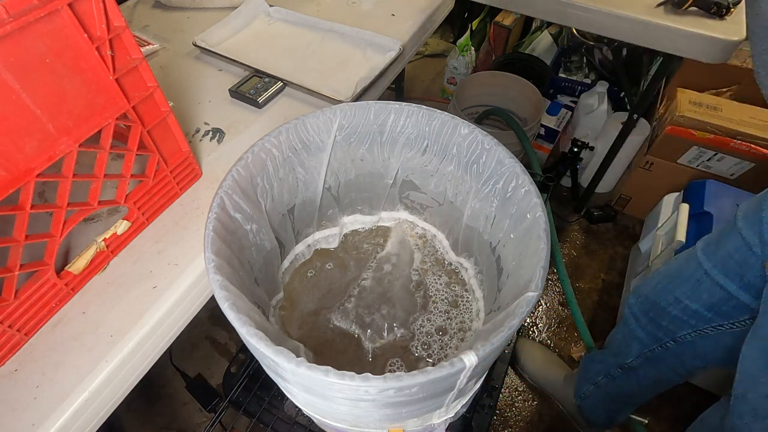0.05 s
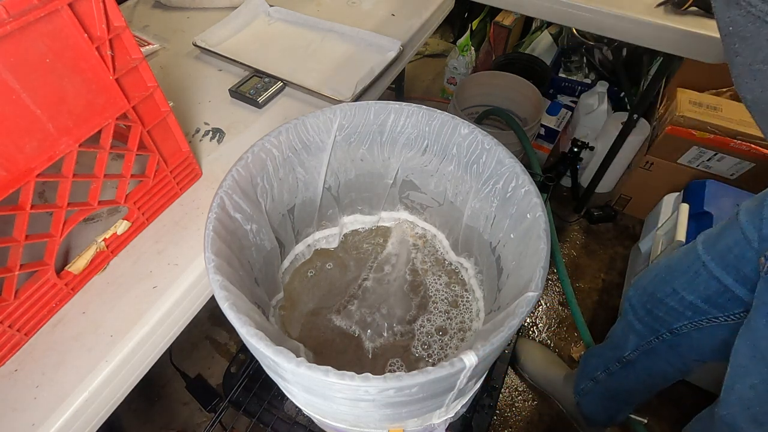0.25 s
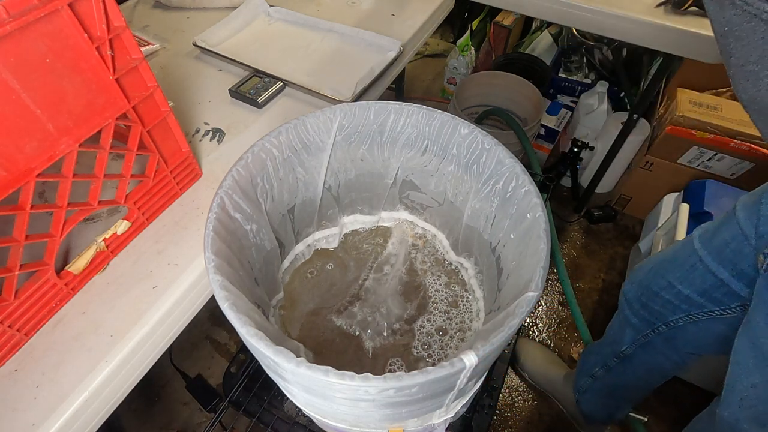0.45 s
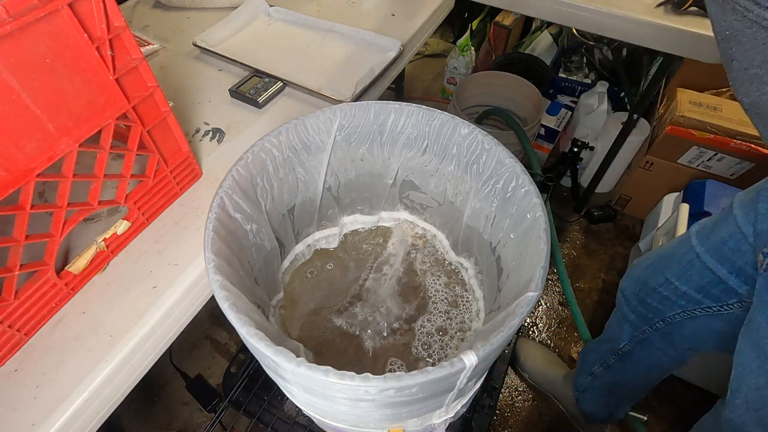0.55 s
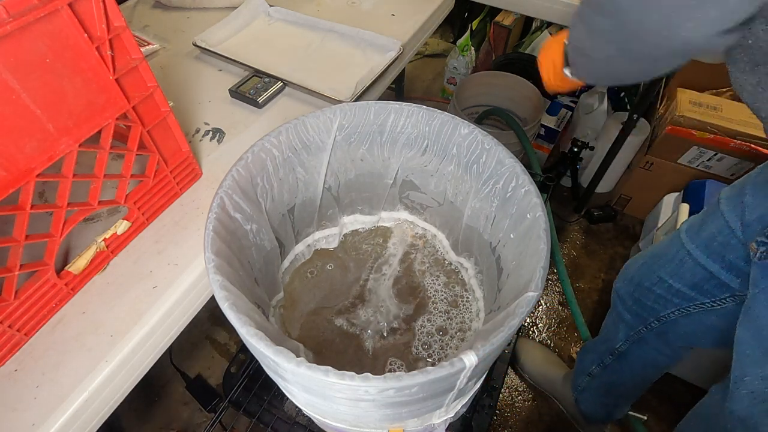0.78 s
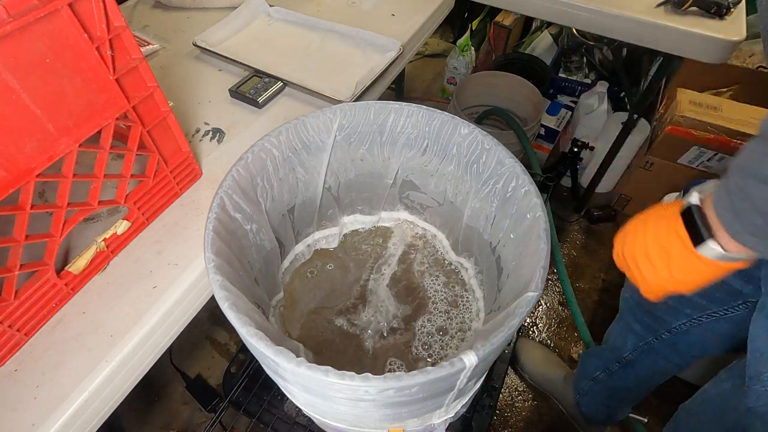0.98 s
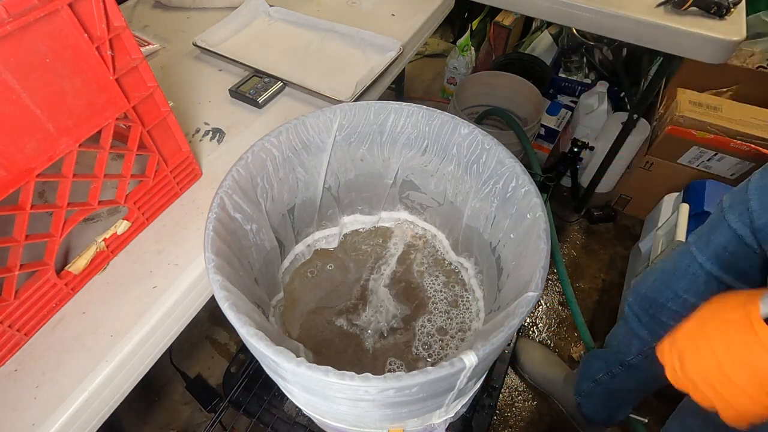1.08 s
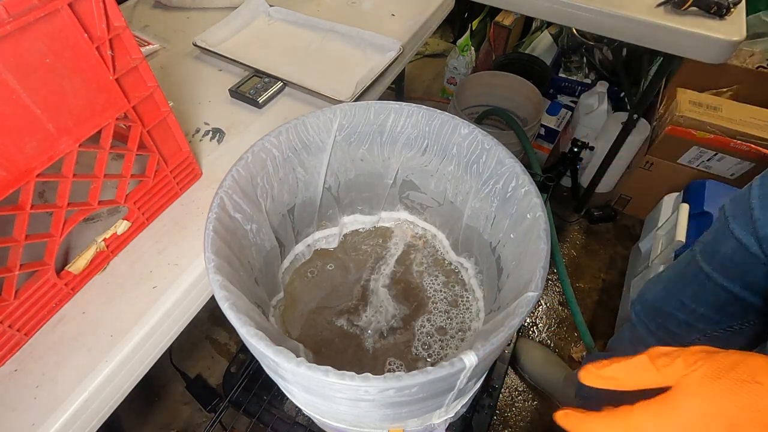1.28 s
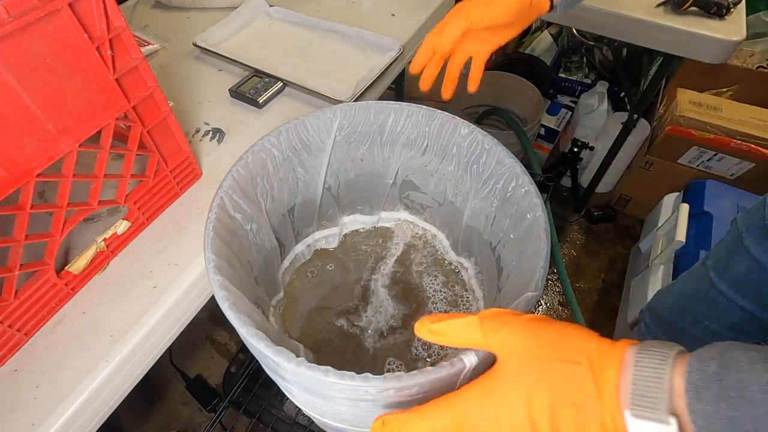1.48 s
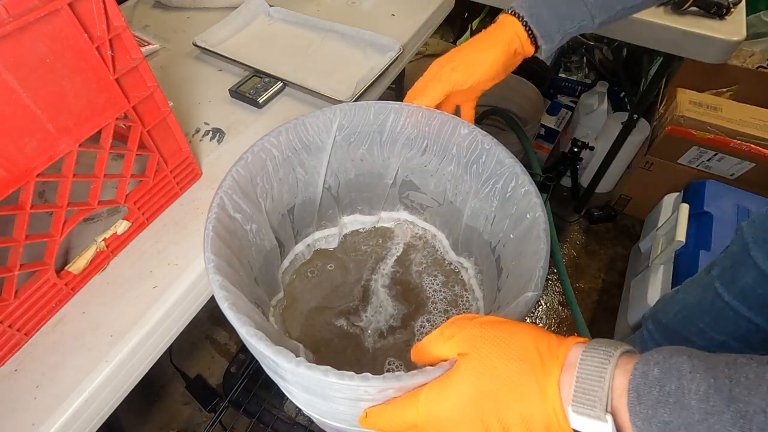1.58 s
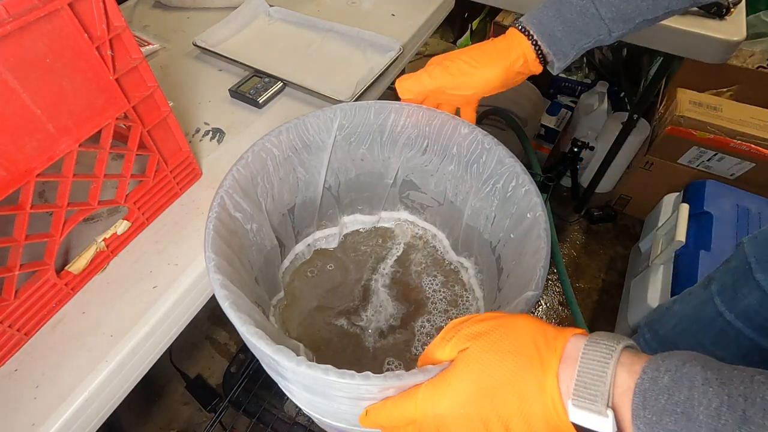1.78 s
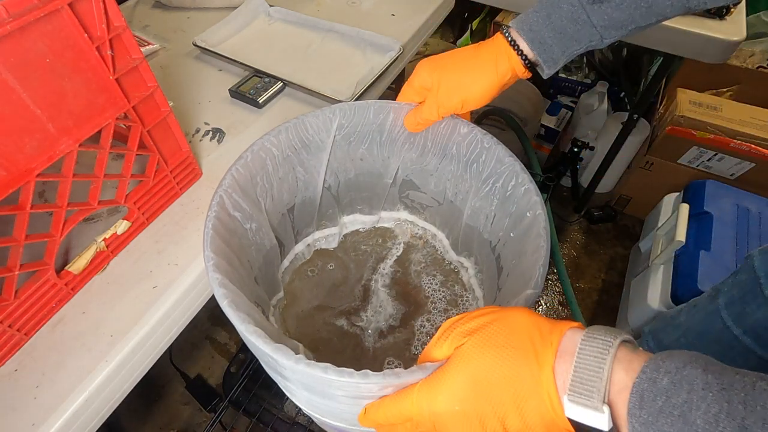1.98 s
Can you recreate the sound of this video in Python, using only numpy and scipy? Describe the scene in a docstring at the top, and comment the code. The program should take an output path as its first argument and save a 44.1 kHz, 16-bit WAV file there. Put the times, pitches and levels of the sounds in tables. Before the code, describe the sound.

Dripping water plinks in a bucket; hollow plastic scrapes early and is softly bumped later.

```python
"""Bubbles plink, drops splat and foam ticks: water drains through a mesh bag in a bucket, heard from
just above in a small workroom. Bubbles are dying sines; drops and foam are short noise bursts.
Early on something hollow, probably plastic, slides with a juddering scrape: stick-slip jolts shake
it and the table. Soft knocks, clearest near the end, as gloved hands take hold of the bucket."""
import sys
import numpy as np
from scipy import signal
from scipy.fft import rfft, irfft, next_fast_len
from scipy.io import wavfile

SR = 44100
rng = np.random.default_rng(int(sys.argv[2]) if len(sys.argv) > 2 else 0)


def to_wav(s):
    """Save 16-bit WAV."""
    ch = np.atleast_2d(s).T  # columns
    pcm = np.round(np.clip(ch, -1, 1) * 32767)  # PCM
    wavfile.write(sys.argv[1], SR, pcm.astype(np.int16))


N = 90404
TIME_S = np.arange(N) / SR

# Noise floor spectrum (frequency [Hz], gain [dB])
FLOOR_SPECTRUM = [(25, -26.5), (60, -10), (120, -28.5), (200, -14.5), (400, -1), (800, -7), (1300, 0),
                  (2500, -1.5), (4000, -10), (6000, -17), (10000, -20), (15000, -30)]
# Dull background wash (time [s], level [dB])
WASH_LEVELS = [(0, -59.5), (.65, -62.5), (1.05, -59.5), (1.3, -67.5), (1.5, -72)]
# Wash spectrum (frequency [Hz], gain [dB])
WASH_SPECTRUM = [(50, -30), (100, -10), (150, -1), (400, -1), (700, 3), (1200, 0.5), (2500, -23),
                 (6000, -54)]
# Reflections off water, walls and table (delay [s], gain [ratio])
ECHOES = [(.0021, -0.088), (.0037, 0.041), (.0058, 0.088), (.0079, -0.0063)]
# Room decay (frequency [Hz], T60 [s])
ROOM_T60 = [(150, 0.5), (600, 0.3), (2500, 0.2), (8000, 0.17), (15000, 0.11)]
# Stereo side spectrum (frequency [Hz], gain [dB])
SIDE_SPECTRUM = [(100, -47.5), (700, -67.5), (1400, -38), (2800, -34), (5500, -24.5), (10000, -21)]

# Knocks (time [s], ring level [dB], ring decay [s], thud centre [Hz], thud level [dB], thud decay [s])
KNOCKS = [(.038, -65, 0.0074, 740, -31.5, 0.0074), (1.082, -57, .012, 310, -54, 0.018),
          (1.648, -41.5, 0.0066, 392, -38.5, 0.0093), (1.672, -60, 0.033, 215, -45.5, 0.0067),
          (1.932, -33, 0.03, 455, -34.5, 0.022)]
# Modes of the knocked plastic (frequency [Hz], gain [dB], share of ring decay [ratio])
KNOCK_MODES = [(366.6, 1.5, 1), (579, -7.5, 0.21), (780, -9, 0.14), (241, -16.5, .5)]

# Slide envelopes (time [s], table rumble [dB], hollow body [dB], grit [dB])
SLIDE_LEVELS = [(.03, -74, -61.5, -94), (.042, -43.5, -47.5, -82), (.075, -51.5, -65, -90),
                (.115, -68, -55.5, -63), (.145, -51.5, -59.5, -80.5), (.185, -43.5, -53, -56),
                (.22, -41.5, -34.5, -61), (.25, -34.5, -37, -54.5), (.298, -42.5, -30, -39.5),
                (.31, -40, -26, -40), (.34, -44.5, -29, -35.5), (.358, -39.5, -18, -36),
                (.402, -33, -31, -39), (.44, -42.5, -32, -37.5), (.462, -42, -31, -45),
                (.51, -38, -29, -42.5), (.572, -39.5, -33.5, -59), (.6, -48.5, -44.5, -60),
                (.65, -75, -71, -78), (.72, -79, -88, -100)]
# Table rumble spectrum (frequency [Hz], gain [dB])
RUMBLE_SPECTRUM = [(30, -45.5), (65, -38), (100, -16), (125, -9), (148, 8), (178, -6.5), (208, 4.5),
                   (280, -4), (345, 0), (410, -9.5), (700, -15), (2000, -72)]
# Hollow body modes (frequency [Hz], bandwidth [Hz], gain [dB])
BODY_MODES = [(468.6, 30, -3.5), (589, 51, -3), (658, 75, -4.5), (747, 56, -1.5), (811, 20, -0.5),
              (882, 45, -1.5), (1016, 234, -10.5), (1177, 57, -8.5)]
# Filter after the body modes (frequency [Hz], gain [dB])
BODY_SPECTRUM = [(60, -60.5), (200, -3), (420, -5.5), (600, -4.5), (1000, -2.5), (1250, -6), (1500, 0.5),
                 (3000, -17)]
# Contact grit spectrum (frequency [Hz], gain [dB])
GRIT_SPECTRUM = [(100, -59), (600, -33), (1300, 6.5), (2000, 0.5), (2750, 1.5), (3400, -11), (4400, -19.5),
                 (5500, -29.5), (10000, -40), (16000, -74)]
# Crackling contact hiss (time [s], level [dB])
HISS_LEVELS = [(.33, -76.5), (.41, -64.5), (.46, -51), (.5, -53.5), (.57, -57), (.6, -75), (.64, -72),
               (.72, -80.5)]
# Hiss spectrum (frequency [Hz], gain [dB])
HISS_SPECTRUM = [(3000, -15), (4500, 3.5), (5800, -11), (8000, -1.5), (11500, -6.5), (15000, -7)]
# Strongest scrape resonance (time [s], pitch [Hz], level [dB])
GROAN_TRACK = [(.18, 591.7, -50), (0.219, 657.7, -29.5), (0.244, 713.3, -41), (0.327, 820, -54),
               (0.358, 807.2, -29.5), (0.384, 611.3, -24), (0.4, 591, -20.5), (.44, 587, -30),
               (.48, 556, -33.5), (.55, 576, -89)]

# Small bubbles (time [s], trickle [dB], foam [dB])
TRICKLE_FOAM_LEVELS = [(0, -65, -70), (.6, -61.5, -78.5), (.71, -71, -67.5), (.82, -55.5, -81.5),
                       (.95, -55.5, -73), (1.22, -65.5, -66.5), (1.4, -60, -67.5), (1.47, -63.5, -65),
                       (1.56, -64, -67.5), (1.68, -54.5, -80.5), (1.83, -61.5, -64.5), (2.05, -82, -82.5)]
# Drop splats and foam ticks (time [s], centre [Hz], level [dB], width [octaves], decay [s])
SPLATS = [(.007, 6850, -35, 0.21, 0.0012), (.078, 8260, -47, 0.16, 0.0033),
          (.112, 2300, -40.5, 0.17, 0.0036), (.143, 3470, -35.5, 0.27, 0.0073),
          (0.257, 7120, -44, 0.18, 0.0067), (.453, 3900, -39, 0.22, 0.0053),
          (0.559, 3200, -36.5, 0.43, 0.0073), (0.56, 10500, -46.5, 0.2, 0.0045),
          (.611, 11700, -33.5, 0.26, 0.0022), (0.62, 9500, -37, 1, 0.0025),
          (0.684, 8500, -46.5, 0.2, 0.0024), (0.739, 2570, -43.5, 0.15, 0.0056),
          (0.787, 3150, -32, 0.3, 0.0076), (.829, 4570, -43.5, 0.79, 0.0026),
          (.855, 3140, -36.5, 0.23, 0.0024), (.902, 8300, -49.5, 0.34, 0.012),
          (.906, 2310, -48.5, 0.89, 0.013), (0.982, 5670, -48, 0.42, 0.0051),
          (1.037, 4100, -38.5, 0.15, 0.0037), (1.064, 4570, -37, 0.15, 0.0033),
          (1.078, 9700, -43.5, 0.43, 0.005), (1.217, 4080, -36, 0.11, 0.0054),
          (1.265, 10700, -48, 0.091, 0.004), (1.300, 4560, -48, 0.13, 0.0027),
          (1.33, 6780, -45.5, 0.09, 0.0017), (1.33, 11100, -58, 0.25, 0.0018),
          (1.245, 7600, -55.5, 0.16, 0.0075), (1.343, 3950, -49, 0.32, 0.0063),
          (1.383, 5960, -50.5, 0.05, 0.0047), (1.456, 3870, -50, 0.62, 0.0059),
          (1.517, 2963, -36, 0.39, 0.0046), (1.626, 6510, -57.5, .4, 0.036),
          (1.672, 4140, -50.5, 0.13, 0.016), (1.913, 5560, -51.5, 0.11, 0.0041),
          (1.934, 6800, -55, 1, 0.0091), (1.959, 5120, -52.5, 0.3, 0.0053), (1.415, 5900, -50, 0.54, .004),
          (1.81, 3070, -47.5, 0.25, 0.014)]
# Single bubbles (time [s], pitch [Hz], level [dB], decay [s], glide [octaves/s])
BUBBLES = [(.002, 2296, -36.5, 0.0077, 3.5), (0.063, 1717, -39, 0.0062, 8), (.112, 1816, -31, 0.0043, 8),
           (.113, 877, -37.5, 0.021, -1.5), (0.171, 1378, -47, 0.022, 1), (0.628, 1456, -50.5, 0.027, 1),
           (.657, 2126, -46.5, 0.0064, 17), (.738, 1387, -42.5, 0.049, 5), (0.765, 1630, -33, 0.0042, -6),
           (.771, 1350, -26, 0.0076, -0.5), (0.784, 2805, -39, .005, 9.5), (0.809, 1720, -38, 0.0059, 14),
           (0.83, 1677, -34.5, 0.0043, -3), (.835, 845, -42.5, 0.021, 1), (.907, 2022, -38.5, 0.01, 9),
           (0.981, 4304, -40.5, 0.0089, 2), (1.037, 2660, -31, .003, 19.5),
           (1.064, 2220, -28.5, 0.0034, 14), (1.078, 1444, -29, 0.0016, 35),
           (1.086, 737, -33.5, 0.0035, 21), (1.132, 2662, -29.5, 0.0048, 16.5),
           (1.142, 612, -43.5, 0.016, 7), (1.166, 676, -43, 0.014, 34.5), (1.181, 1884, -33, 0.0076, 30),
           (1.187, 3520, -34.5, 0.0033, 10), (1.219, 3695, -39, 0.0073, -4.5),
           (1.216, 1570, -43.5, 0.0079, -3.5), (1.265, 971, -47, .022, 1), (1.300, 2360, -50.5, 0.015, 8.5),
           (1.36, 1600, -48, .013, 0.5), (1.414, 4450, -46.5, 0.0056, 1.5), (1.493, 2190, -33, 0.0019, 13),
           (1.515, 1837, -32.5, 0.0033, 10), (1.52, 3080, -36.5, 0.0046, 1), (1.548, 1383, -38.5, 0.018, 3),
           (1.554, 3054, -45, 0.012, 3), (1.583, 2130, -32.5, 0.0046, -1), (1.627, 1542, -32.5, 0.0049, 13),
           (1.674, 1450, -34, 0.0059, 13.5), (1.774, 2273, -40, 0.018, 15), (1.777, 2993, -40, 0.009, 4),
           (1.809, 1504, -43.5, 0.013, 15), (1.868, 2026, -36.5, .005, 18.5), (1.87, 2740, -34, 0.0024, 10),
           (1.913, 2800, -38, 0.0019, 8), (2.014, 1360, -47, 0.0085, 11), (2.026, 2640, -44, 0.0058, 11),
           (2.038, 670, -38, 0.0069, 19)]

BUBBLE_RISE_S, TICK_RISE_S, KNOCK_RISE_S = 0.0017, 0.0007, 0.0025


def amp(db):
    return 10 ** (np.asarray(db) / 20)


def unit_rms(x):
    return x / np.sqrt(np.mean(x ** 2) + 1e-20)


def curve_at(points, hz):
    """Interpolates on a log-frequency axis."""
    points_hz, values = np.transpose(points)
    return np.interp(np.log(hz + 1), np.log(points_hz), values)


def envelopes(table):
    """One gain curve per dB column."""
    times_s, *columns_db = np.transpose(table)
    return [amp(np.interp(TIME_S, times_s, db)) for db in columns_db]


def colour(x, spectrum):
    """Zero-phase filter."""
    size = next_fast_len(len(x) + 4096)
    gain = amp(curve_at(spectrum, np.fft.rfftfreq(size, 1 / SR)))
    return irfft(rfft(x, size) * gain, size)[:len(x)]


def add(mix, start_s, sound):
    part = mix[max(round(start_s * SR), 0):][:len(sound)]
    part += sound[:len(part)]


def ring(hz, decay_s, rise_s, octaves_per_s=0, shape=1.18):
    """Dying sine, soft onset, optional glide; shape > 1 dies faster towards the end."""
    t = TIME_S[:int(7 * decay_s * SR) + 256]
    cycles = np.cumsum(hz * 2 ** np.minimum(octaves_per_s * t, 1)) / SR
    onset = 1 - np.exp(-(t / rise_s) ** 2)
    fade = np.exp(-(t / (decay_s + rise_s)) ** shape)
    return onset * fade * np.sin(2 * np.pi * cycles)


def puff(hz, octaves, decay_s, rise_s=TICK_RISE_S):
    """Dying burst of band noise."""
    t = TIME_S[:4096]
    bins_hz = np.fft.rfftfreq(len(t), 1 / SR) + 1
    band = 1 / (1 + (np.log2(bins_hz / hz) / octaves) ** 4)
    noise = unit_rms(irfft(band * np.exp(2j * np.pi * rng.random(len(bins_hz)))))
    return noise * (1 - np.exp(-t / rise_s)) * np.exp(-t / decay_s)


def swarm(grain, low_hz, high_hz, per_s, spread_db, pitches=36):
    """Grains of random pitch, size and time."""
    out = np.zeros(N)
    for hz in np.geomspace(low_hz, high_hz, pitches) * rng.uniform(0.88, 1.04, pitches):
        births = rng.random(N) < per_s / pitches / SR
        sizes = amp(spread_db * np.minimum(rng.exponential(1, N), 3))
        out += signal.oaconvolve(births * sizes, grain(hz))[:N]
    return unit_rms(out)


def background(floor_db=-64.5):
    """Steady noise floor plus a dull, fading wash."""
    floor = unit_rms(colour(rng.standard_normal(N), FLOOR_SPECTRUM))
    wash = unit_rms(colour(rng.standard_normal(N), WASH_SPECTRUM))
    return amp(floor_db) * floor + envelopes(WASH_LEVELS)[0] * wash


def room_tail(x, build_s=0.0031):
    """Short diffuse tail; treble dies first."""
    hz, t, noise = signal.stft(rng.standard_normal(SR), SR, nperseg=256)
    fade = amp(-60 * t / curve_at(ROOM_T60, hz)[:, None])
    tail = signal.istft(noise * fade, SR, nperseg=256)[1]
    tail *= np.minimum(np.arange(len(tail)) / SR / build_s, 1)
    return signal.fftconvolve(x, tail / np.linalg.norm(tail))[:N]


def reflect(x):
    """Direct sound plus close reflections."""
    out = x.copy()
    for delay_s, gain in ECHOES:
        add(out, delay_s, gain * x)
    return out


def knocks(thud_octaves=0.57):
    """Soft thuds on plastic; the gloved hand chokes the ring."""
    out = np.zeros(N)
    for start_s, ring_db, decay_s, thud_hz, thud_db, thud_decay_s in KNOCKS:
        for hz, mode_db, share in KNOCK_MODES:
            mode = ring(hz, decay_s * share, KNOCK_RISE_S, shape=2.8)
            add(out, start_s, amp(ring_db + mode_db) * mode)
        add(out, start_s, amp(thud_db) * puff(thud_hz, thud_octaves, thud_decay_s, KNOCK_RISE_S))
    return out


def stick_slip(per_s=190, jitter=0.45, spread_db=2):
    """Friction jolts, uneven in spacing and size."""
    gap_draws, size_draws = rng.standard_normal((900, 2)).T
    at = (np.cumsum(np.exp(jitter * gap_draws)) / per_s * SR).astype(int)
    slips = np.zeros(N)
    slips[at[at < N]] = amp(spread_db * np.clip(size_draws[at < N], -2, 2))
    return slips


def hollow_body(friction):
    """Friction drives damped modes of alternating sign."""
    t = TIME_S[:SR // 8]
    response = np.zeros(len(t))
    for k, (hz, width_hz, db) in enumerate(BODY_MODES):
        envelope = amp(db) * width_hz * np.exp(-np.pi * width_hz * t)
        response += (-1) ** k * envelope * np.sin(2 * np.pi * hz * t)
    return unit_rms(colour(signal.oaconvolve(friction, response)[:N], BODY_SPECTRUM))


def slide(rub_db=-2, grit_decay_s=0.0047):
    """Jolts shake table and hollow body; grit and fine crackle at the contact."""
    slips = stick_slip()
    friction = unit_rms(slips - slips.mean()) + amp(rub_db) * rng.standard_normal(N)
    rumble = unit_rms(colour(friction, RUMBLE_SPECTRUM))
    body = hollow_body(friction)
    pulses = signal.oaconvolve(slips, np.exp(-TIME_S[:SR // 8] / grit_decay_s))[:N]
    grains = rng.standard_normal(N) * (1.4 + unit_rms(pulses))
    grit = unit_rms(colour(grains, GRIT_SPECTRUM))
    crackle = swarm(lambda hz: puff(hz, octaves=0.12, decay_s=0.0036),
                    low_hz=3890, high_hz=14080, per_s=2000, spread_db=6.5)
    hiss = unit_rms(colour(unit_rms(reflect(crackle)) + 0.5 * unit_rms(grains), HISS_SPECTRUM))
    rumble_gain, body_gain, grit_gain = envelopes(SLIDE_LEVELS)
    hiss_gain = envelopes(HISS_LEVELS)[0]
    return rumble_gain * rumble + body_gain * body + grit_gain * grit + hiss_gain * hiss


def groan(waver_octaves=0.0584, judder_depth=0.56):
    """Rough resonance kept ringing by friction; swells and sinks with pressure."""
    times_s, hz, db = np.transpose(GROAN_TRACK)
    slow = [(120, -6.5), (300, -34.5), (900, -70)]  # (frequency [Hz], gain [dB])
    waver, judder = (unit_rms(colour(noise, slow)) for noise in rng.standard_normal((2, N)))
    cycles = np.cumsum(np.interp(TIME_S, times_s, hz) * 2 ** (waver_octaves * waver)) / SR
    tone = unit_rms((1 + judder_depth * judder) * np.sin(2 * np.pi * cycles))
    return amp(np.interp(TIME_S, times_s, db, left=-np.inf, right=-np.inf)) * tone


def trickle_and_foam(decay_cycles=8.1, rise_cycles=2):
    """Small bubbles ring in the trickle and burst in the foam."""
    trickle = swarm(lambda hz: ring(hz, decay_cycles / hz, rise_cycles / hz),
                    low_hz=1161, high_hz=3434, per_s=480, spread_db=5.5)
    foam = swarm(lambda hz: puff(hz, octaves=0.16, decay_s=0.0041),
                 low_hz=3840, high_hz=11400, per_s=260, spread_db=11)
    trickle_gain, foam_gain = envelopes(TRICKLE_FOAM_LEVELS)
    return trickle_gain * trickle + foam_gain * foam


def splats():
    """Drops land and foam bursts: one noise puff each."""
    out = np.zeros(N)
    for start_s, hz, db, octaves, decay_s in SPLATS:
        add(out, start_s, amp(db) * puff(hz, octaves, decay_s))
    return out


def bubbles(splash_db=-6, splash_octaves=0.2):
    """Each bubble rings with a gliding pitch; the surface around it splashes."""
    out = np.zeros(N)
    for start_s, hz, db, decay_s, octaves_per_s in BUBBLES:
        add(out, start_s, amp(db) * ring(hz, decay_s, BUBBLE_RISE_S, octaves_per_s))
        add(out, start_s, amp(db + splash_db) * puff(hz, splash_octaves, decay_s, BUBBLE_RISE_S))
    return out


def scene(low_cut_hz=170, water_room_db=-11, knock_room_db=-12, scrape_room_db=-18.5):
    """All sources near centre, slightly wider in the treble."""
    ambience = background()
    scrape = slide() + groan()
    low_cut = signal.butter(2, low_cut_hz, "high", fs=SR, output="sos")
    water = signal.sosfilt(low_cut, reflect(bubbles() + splats() + trickle_and_foam()))
    bumps = signal.sosfilt(low_cut, knocks())
    send = amp(water_room_db) * water + amp(knock_room_db) * bumps + amp(scrape_room_db) * scrape
    mid = ambience + room_tail(send) + bumps + scrape + water
    side = colour(room_tail(mid), SIDE_SPECTRUM)
    return np.array([mid + side, mid - side])


def record(dry, cutoff_hz=16000):
    """Low-pass band limit."""
    low_pass = signal.firwin(255, cutoff_hz, window=("kaiser", 9), fs=SR)
    return signal.oaconvolve(dry, low_pass[None], "same")


dry = scene()
out = record(dry)
to_wav(out)
```